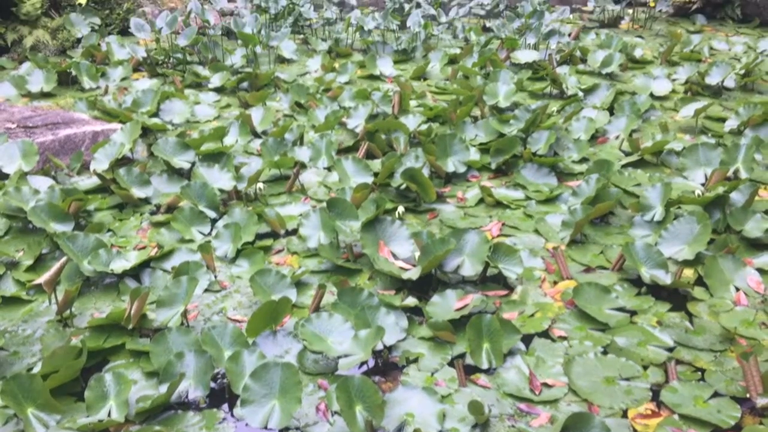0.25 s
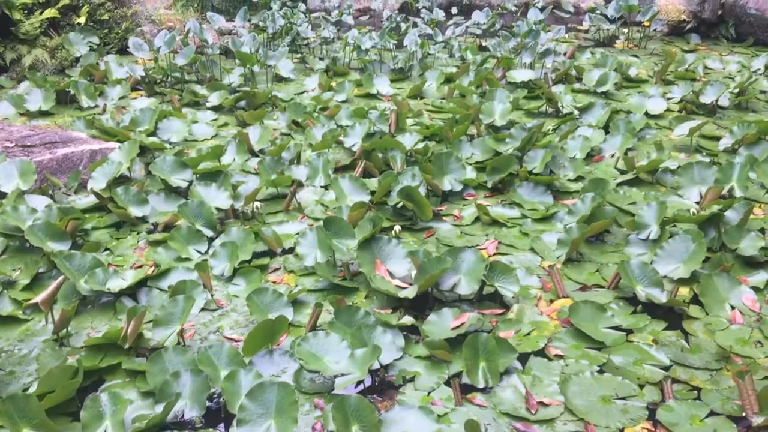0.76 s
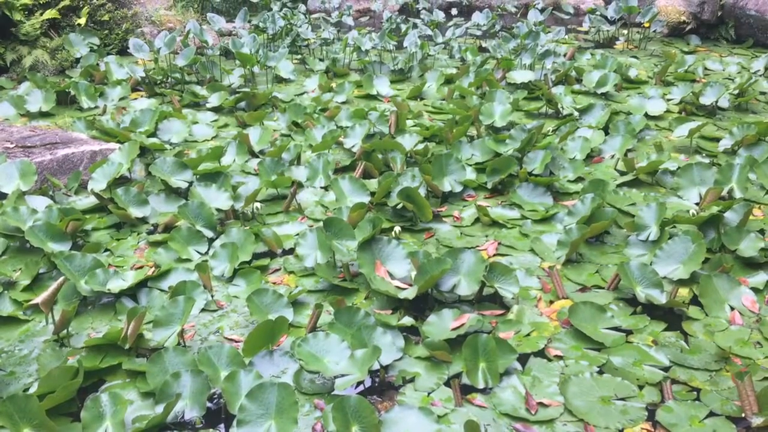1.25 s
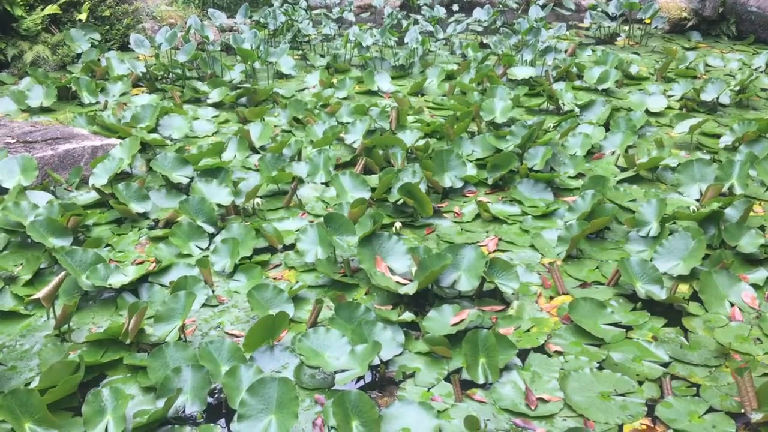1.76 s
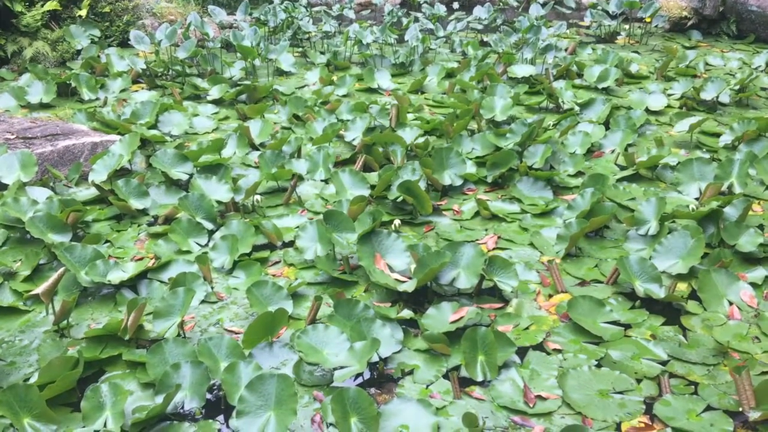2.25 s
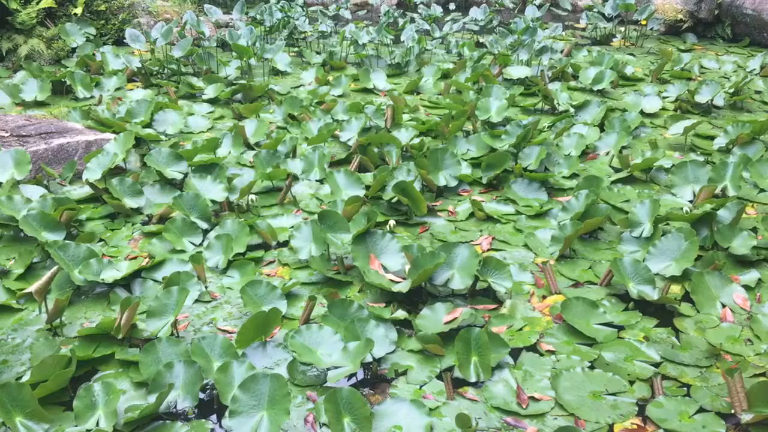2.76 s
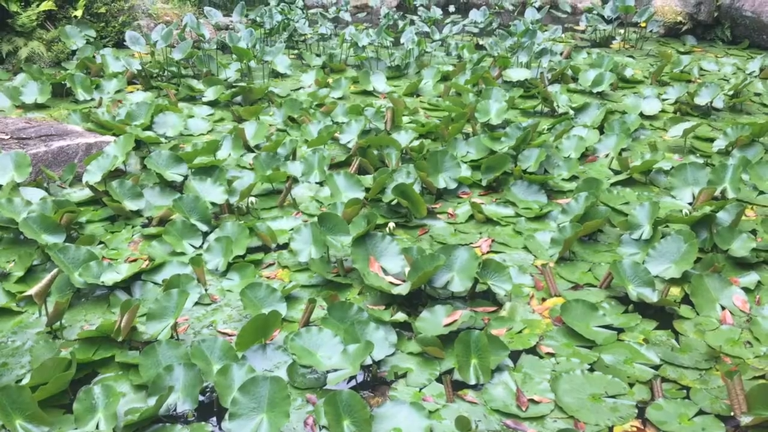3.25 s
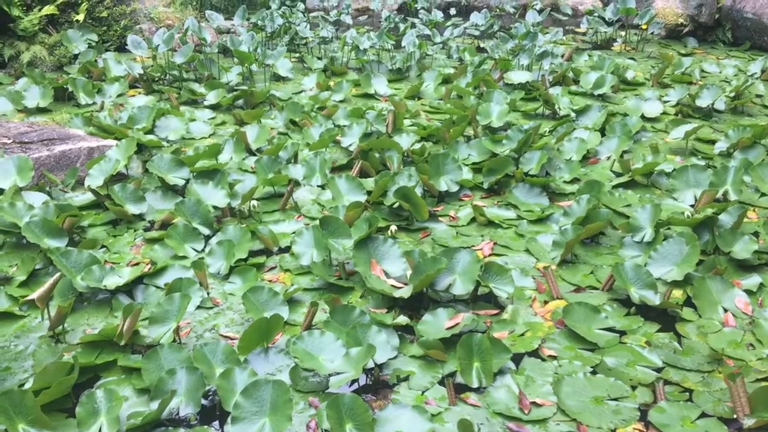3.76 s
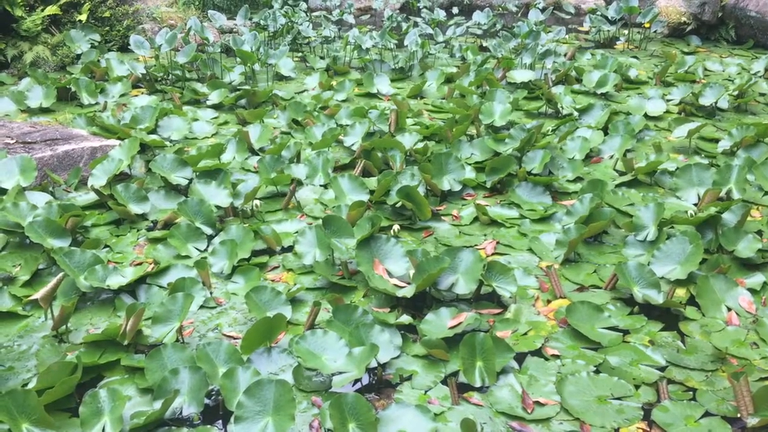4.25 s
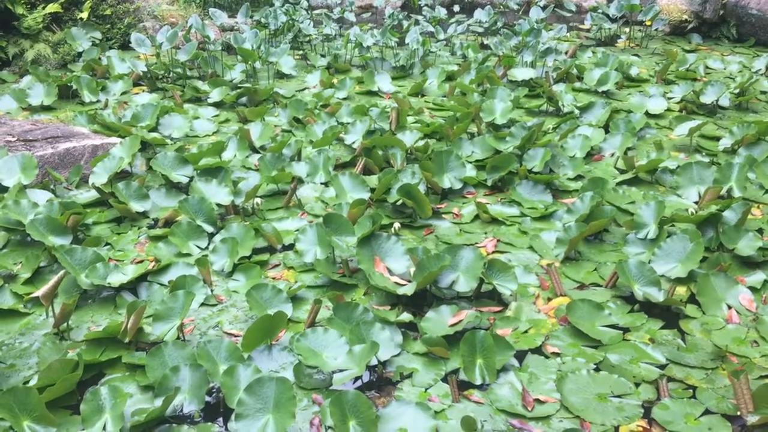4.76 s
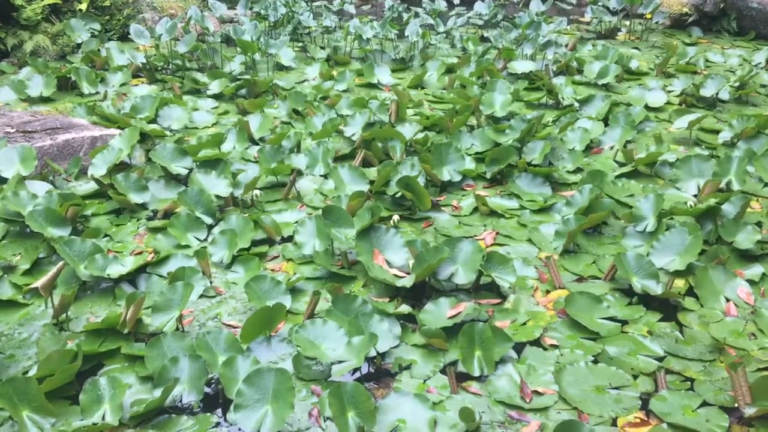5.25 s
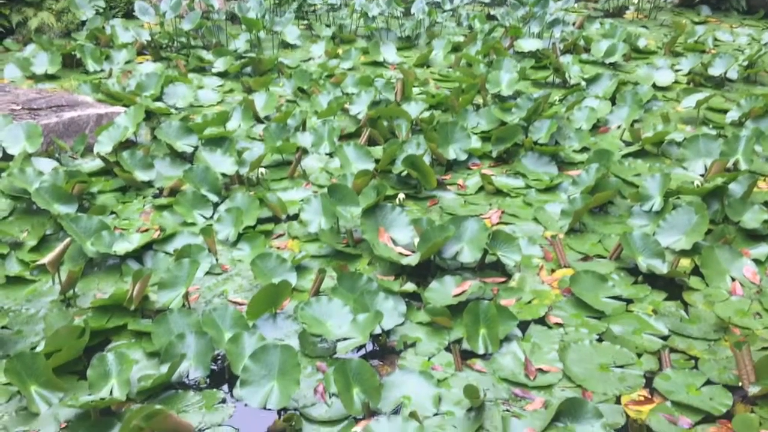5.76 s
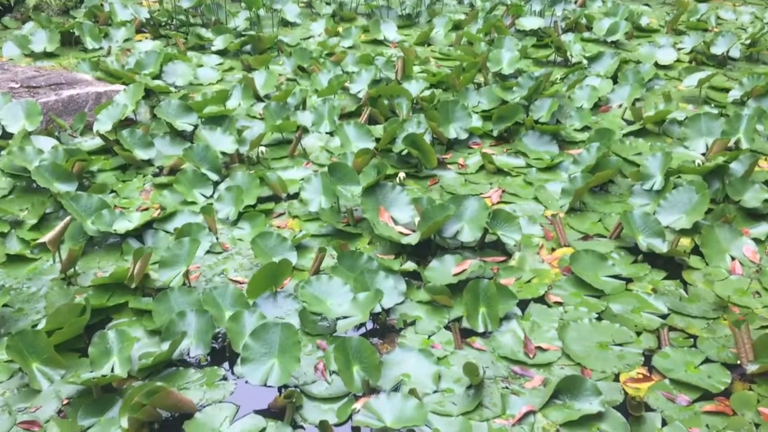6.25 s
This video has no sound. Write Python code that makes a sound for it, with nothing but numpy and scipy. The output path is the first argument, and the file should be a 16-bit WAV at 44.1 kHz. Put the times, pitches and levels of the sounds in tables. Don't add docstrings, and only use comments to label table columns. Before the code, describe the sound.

A close microphone at a pond catches two frogs giving rattles of about thirty-five clicks a second: near one first, loud and crisp, then the far one, softer and rounder, twice each before a shared ending. Distant sparrow chirps come about twice every second or so, an insect buzzes faintly, a held bird whistle breaks into fast swoops, and fingers bump the casing over quiet open-air hiss.

```python
import sys
import numpy as np
from scipy import signal
from scipy.fft import rfft, irfft
from scipy.io import wavfile
from scipy.ndimage import uniform_filter1d

SR = 44100
rng = np.random.default_rng(int(sys.argv[2]) if len(sys.argv) > 2 else 0)


def magnitude_from_level(level_db):
    exponent = np.asarray(level_db, float) / 20
    return 10 ** exponent


def unload_audio(sound):
    columns = np.transpose(np.atleast_2d(sound))
    steps = np.round(np.clip(columns, -1, 1) * 32767)
    wavfile.write(sys.argv[1], SR, steps.astype(np.int16))


N = 286650
LEAD = SR // 5

# pitch_hz, level_db (per Hz)
RUMBLE_COLOUR = [(14, -39), (24, -9.5), (43, -3.5), (59, 9.5), (70, -4), (87, -1), (113, -2.5),
                 (157, -10.5), (351, -14), (433, -31.5), (485, -24), (583, -25), (700, -23), (910, -25),
                 (1540, -120)]
AIR_COLOUR = [(240, -61), (400, 0), (425, -3), (596, -8), (685, -6.5), (849, -4.5), (1270, -3),
              (1390, -8.5), (1500, -3.5), (1890, -6), (2380, -8), (3890, -8.5), (4750, -10), (6870, -12),
              (15700, -19)]
# start_s, end_s, level_db
GUSTS = [
    (2.0, 2.8, -70.5),
    (3.2, 3.3, -63),
    (3.5, 3.6, -66),
    (4.58, 4.72, -58),
    (4.95, 5.15, -62),
]
# start_s, end_s, level_db
RUSTLES = [
    (4.68, 4.85, -79),
    (5.08, 5.28, -68.5),
    (5.5, 5.8, -72.5),
]
# start_s, peak_db, ring_hz, crack_db
TAPS = [
    (3.636, -56, 350, -12),
    (4.794, -53, 666, 5),
    (4.798, -57.5, 1140, 0),
    (4.982, -39, 582, -24),
    (4.981, -47, 266, -16),
    (5.163, -44, 1175, -18),
    (5.731, -50.5, 523, -6),
    (6.117, -44.5, 555, -3),
]
# pitch_hz, width_hz, level_db
PORT_DIPS = [(7570, 710, -3.5), (10470, 640, -4.5), (14900, 900, 4.5)]
# start_s, end_s, level_db
BUZZES = [
    (1.37, 1.85, -77.5),
    (3.42, 4.1, -75),
    (4.45, 4.9, -76),
    (5.75, 6.15, -79),
]
# start_s, level_db, pitch_factor, second_note_db
CHIRPS = [(0.626, -64, 1.01, 2.5), (1.227, -66, 1.015, 2), (1.781, -62.5, 0.99, -2.5),
          (2.764, -68, 0.99, -7), (3.398, -71.5, 1.01, 6), (3.931, -60.5, 0.99, -15),
          (4.451, -68.5, .99, 5), (4.999, -63, 0.99, -6.5), (5.891, -61.5, 1.05, 3), (6.194, -60, 1.005, 0)]
# time_s, pitch_hz, level_db
CHIRP_NOTES = [
    [(0, 4297, -3), (.01, 3986, -2.5), (.03, 4032, 1.5), (.045, 3650, -10)],
    [(.03, 3560, -5), (.042, 3460, -3.5), (.06, 2963, -7)],
]
# time_s, pitch_hz, level_db
WHISTLE = [(4.3, 2400, -60), (4.47, 2446, -63), (4.575, 2380, -75), (4.595, 2453, -55.5),
           (4.77, 2401, -50.5), (4.93, 2370, -43), (4.97, 2340, -39), (5.03, 2257, -38.5),
           (5.1, 2270, -38.5)]
# time_s, depth_db, half_width_s
BREAKS = [(4.62, -5, .008), (4.683, -18, 0.0095), (4.707, -9, 0.016), (4.756, -11.5, 0.0071),
          (4.83, -3.5, 0.02), (4.908, -5.5, 0.012), (4.958, -23, 0.0046), (4.986, -17, 0.0046),
          (5.004, -6.5, 0.0043), (5.032, -9, 0.0022), (5.045, -8.5, .003), (5.073, -13, .003),
          (5.089, -8, 0.0057)]
# time_s, pitch_hz, level_db
FLOURISH = [
    [(5.088, 2370, -56), (5.097, 3152, -44), (5.108, 3098, -36), (5.124, 2146, -35.5), (5.136, 1630, -36.5),
     (5.15, 1652, -36.5), (5.156, 1660, -66)],
    [(5.154, 1995, -41), (5.165, 2068, -33.5), (5.2, 2042, -44.5), (5.215, 2080, -46)],
    [(5.265, 2114, -48), (5.278, 2206, -31), (5.29, 2137, -36), (5.305, 1606, -38), (5.333, 1172, -49)],
    [(5.389, 3125, -61), (5.403, 5190, -50), (5.412, 5170, -46), (5.422, 3864, -37), (5.436, 2740, -39),
     (5.448, 2450, -33), (5.462, 2615, -35.5), (5.478, 3650, -40), (5.495, 4360, -48.5)],
]
# time_s, pitch_hz, level_db
THIN_LINES = [
    [(5.455, 2450, -57), (5.48, 2560, -55), (5.525, 2480, -59)],
    [(4.05, 3520, -72), (4.25, 3580, -76), (4.42, 3470, -77)],
    [(4.78, 3520, -80.5), (4.93, 3566, -76), (5.03, 3590, -77)],
]
# start_s, end_s, full_level_db, tilt_db (per octave)
FAR_CROAKS = [
    (2.073, 2.797, -48.5, 0.5),
    (3.134, 3.904, -45.5, 1.5),
    (5.803, 6.474, -45.5, 1.5),
]
# first_s, last_s, clicks (count)
FAR_RUNS = [(2.128, 2.2319, 5), (2.2539, 2.6298, 16), (2.6576, 2.7626, 5), (2.7969, 2.7969, 1),
            (3.1151, 3.1912, 4), (3.2127, 3.4397, 10), (3.466, 3.8028, 14), (3.8345, 3.8345, 1),
            (5.9985, 6.3773, 16), (6.4043, 6.4589, 3)]
# pitch_hz, width_hz, level_db
FAR_BODY = [(1212, 405, 3), (1930, 990, 2.5), (1687, 83, -11), (2370, 83, -19.5), (4800, 10000, -12.5),
            (2655, 105, -18.5)]
# delay_s, pressure_factor
FAR_ECHOES = [(.00081, .35), (.00188, .28), (.00268, -.38), (.0069, .12), (.0105, .15)]
# start_s, end_s, full_level_db
NEAR_CROAKS = [
    (-.2, .77, -30.5),
    (3.562, 4.46, -31),
    (5.346, 6.377, -30),
]
# first_s, last_s, clicks (count)
NEAR_RUNS = [(-.17, -.058, 5), (-.0015, .0269, 2), (.0832, .1121, 2), (.1682, .1979, 2), (.2264, .4491, 9),
             (.4773, .7315, 10), (.7682, .7682, 1), (3.5868, 3.8857, 12), (3.9393, 3.9674, 2),
             (4.0209, 4.0753, 3), (4.1287, 4.1829, 2), (4.2114, 4.2937, 4), (4.3216, 4.3777, 3),
             (4.4065, 4.436, 2), (5.3835, 5.5743, 8), (5.6284, 5.7424, 3), (5.7721, 5.9382, 4),
             (5.9661, 6.0209, 2), (6.0508, 6.1054, 2), (6.1341, 6.3313, 8), (6.3641, 6.3641, 1)]
# pitch_hz, width_hz, level_db
SLACK_SAC = [(936, 110, -8.5), (2270, 1550, 3.5), (1896, 624, 10.5), (1513, 550, 0.5), (2740, 780, -8),
             (5540, 260, -26), (2980, 310, -41), (3390, 140, -25.5)]
TAUT_SAC = [(904, 130, -17), (2450, 2100, 2.5), (2167, 453, 9.5), (1390, 86, -26.5), (2680, 11300, -6),
            (5520, 260, -28), (2940, 227, -4), (3494, 440, -14)]
# delay_s, pressure_factor
NEAR_ECHOES = [(.00195, -.58), (.0046, -.27), (.00557, -.26), (.007, .12)]


def rms_one(x):
    return x / np.sqrt(np.mean(x ** 2) + 1e-30)


def noise(count=N):
    return rng.standard_normal(count)


def band(x, order, low_hz, high_hz):
    return signal.sosfilt(signal.butter(order, [low_hz, high_hz], "band", fs=SR, output="sos"), x)


def drift(rate_hz):
    r = np.exp(-2 * np.pi * rate_hz / SR)
    wander = signal.lfilter([1], [1, -2 * r, r * r], noise(N + SR))
    return rms_one(wander[SR:])


def coloured(colour):
    hz, db = np.transpose(colour)
    bins = np.arange(1, N // 2 + 2) * SR / N
    shape = magnitude_from_level(np.interp(np.log(bins), np.log(hz), db))
    return rms_one(irfft(rfft(noise()) * shape, N))


def bouts(rows, edge_s):
    t = np.arange(N) / SR
    total = np.zeros(N)
    for start, end, db in rows:
        total += magnitude_from_level(db) * (np.tanh((t - start) / edge_s) - np.tanh((t - end) / edge_s)) / 2
    return total


def add(out, at, sound):
    out[at:at + len(sound)] += sound[:N - at]


def ring(clicks, hz, width_hz):
    r, w = np.exp(-np.pi * width_hz / SR), 2 * np.pi * hz / SR
    return signal.lfilter([0, np.sin(w)], [1, -2 * r * np.cos(w), r * r], clicks + 1e-18)


def banks(x, wet_db, t60, onset_s, echoes, cut_hz, low_hz=200):
    t = np.arange(SR) / SR
    decay = magnitude_from_level(-60 * t / t60) + magnitude_from_level(-23.0 - 60 * t / 0.85)
    tail = noise(SR) * decay * (1 - np.exp(-(t / onset_s) ** 2))
    tail = band(tail, 1, low_hz, min(cut_hz, 18000))
    reply = magnitude_from_level(wet_db) * tail / np.sqrt(np.sum(tail ** 2))
    for delay_s, factor in echoes:
        reply[round(delay_s * SR)] += factor
    return x + signal.fftconvolve(x, reply)[:len(x)]


def note(rows, start=0., pitch=0.99, smooth_s=0.002):
    s, hz, db = np.transpose(rows)
    t = np.arange(s[0], s[-1], 1 / SR)
    glide = uniform_filter1d(np.interp(t, s, hz) * pitch, int(smooth_s * SR))
    phase = 2 * np.pi * np.cumsum(glide) / SR
    ends = np.clip(np.minimum(t - s[0], s[-1] - t) / 0.0023, 0, 1)
    tone = np.sin(phase) + magnitude_from_level(-40) * np.sin(2 * phase)
    return round((start + s[0]) * SR), np.sqrt(2) * magnitude_from_level(np.interp(t, s, db)) * ends * tone


def beats(runs, croaks, swell_db, swell_s, grow_db_per_s, uneven_db, uneven_s):
    s = np.concatenate([np.linspace(*run) for run in runs])
    croaks = np.array(croaks)
    row = croaks[np.searchsorted(croaks[:-1, 1] + .15, s)]
    age = s - row[:, 0]
    left = np.maximum(row[:, 1] - s, 0)
    chance = rng.standard_normal((len(s), 2))
    db = row[:, 2] - swell_db * np.clip(1 - age / swell_s, 0, 1) ** 2
    db = db + grow_db_per_s * age + uneven_db * chance[:, 0]
    return s + uneven_s * chance[:, 1], left, db, row


def sac(times, gains, modes, top_hz, tilt_db=0.):
    at, out = np.round(times * SR).astype(int) + LEAD, np.zeros(N + LEAD)
    chance = rng.standard_normal((len(at), len(modes)))
    for k, (hz, width_hz, db) in enumerate(modes):
        spread_db = 1.2 + 2.5 * (hz > 5000)
        strike_db = db + tilt_db * np.log2(hz / 1250) + spread_db * chance[:, k]
        clicks = np.zeros(N + LEAD)
        clicks[at] = gains * magnitude_from_level(strike_db) * np.e * np.pi * width_hz / SR
        out += (-1) ** k * ring(ring(clicks, hz, width_hz), hz, width_hz)
    return band(out, 2, 560, top_hz)


def snaps(times, gains):
    level_db, spread_db, fade_s = -37, 3, .0018
    chance = np.minimum(rng.exponential(1, len(times)), 2)
    clicks = np.zeros(N + LEAD)
    clicks[np.round(times * SR).astype(int) + LEAD] = gains * magnitude_from_level(level_db + spread_db * chance)
    fade = signal.lfilter([1], [1, -np.exp(-1 / (fade_s * SR))], clicks + 1e-18)
    return band(fade * noise(N + LEAD), 1, 4500, 13000)


def rumble():
    level = magnitude_from_level(-65.5) + bouts(GUSTS, edge_s=0.057) / 2
    return level * magnitude_from_level(3.0 * drift(11)) * coloured(RUMBLE_COLOUR)


def air():
    return magnitude_from_level(-71.5 + 0.9 * drift(30)) * coloured(AIR_COLOUR)


def rustle():
    rub = band(noise(), 2, 220, 800)
    return bouts(RUSTLES, edge_s=0.033) * magnitude_from_level(5.8 * drift(26)) * rms_one(rub)


def taps():
    out = np.zeros(N)
    t = np.arange(2000) / SR
    dull = signal.butter(2, 2500, fs=SR, output="sos")
    for s, db, hz, crack_db in TAPS:
        knock = np.sin(2 * np.pi * hz * t) * np.exp(-t / 0.0053)
        crack = signal.sosfilt(dull, noise(len(t))) * np.exp(-t / 0.017)
        add(out, round(s * SR), magnitude_from_level(db) * (knock + magnitude_from_level(crack_db) * crack))
    return out


def insect():
    pitch_hz, width_hz = 5220, 600
    buzz = ring(ring(noise(), pitch_hz, width_hz), pitch_hz, width_hz)
    return bouts(BUZZES, edge_s=0.08) * magnitude_from_level(0.98 * drift(25)) * rms_one(buzz)


def sparrow():
    out = np.zeros(N)
    for s, db, pitch, second_db in CHIRPS:
        for rows, note_db in zip(CHIRP_NOTES, (db, db + second_db)):
            at, sound = note(rows, s, pitch)
            add(out, at, magnitude_from_level(note_db) * sound)
    flutter_hz = 340 * (1 + 0.072 * drift(29.7))
    flutter = np.cos(2 * np.pi * np.cumsum(flutter_hz) / SR)
    out *= 1 + 1.04 * flutter + 0.96 * drift(450)
    return banks(out, wet_db=-6.0, t60=0.55, onset_s=0.011, echoes=[], cut_hz=19000)


def warbler():
    whistle, flourish, t = np.zeros(N), np.zeros(N), np.arange(N) / SR
    add(whistle, *note(WHISTLE))
    whistle *= magnitude_from_level(sum(db * np.exp(-((t - s) / half) ** 2) for s, db, half in BREAKS))
    for rows in FLOURISH + THIN_LINES:
        add(flourish, *note(rows))
    whistle = banks(whistle, wet_db=-14.0, t60=.8, onset_s=.01, echoes=[], cut_hz=9000)
    flourish = banks(flourish, wet_db=-2.5, t60=0.78, onset_s=0.0011, echoes=[(.052, 0.11)],
                     cut_hz=7900, low_hz=2220)
    return whistle + flourish


def far_frog():
    s, left, db, row = beats(FAR_RUNS, FAR_CROAKS, swell_db=16.5, swell_s=0.4, grow_db_per_s=2.0,
                             uneven_db=1.1, uneven_s=.0007)
    shy_db = 6 * np.exp(-(s - row[:, 0]) / 0.097)
    tired_db = 15.5 * np.exp(-left / 0.049)
    tilt_db = row[:, 3] - tired_db - shy_db
    voice = sac(s - .0008, magnitude_from_level(db + 2.5), FAR_BODY, top_hz=6900, tilt_db=tilt_db)
    return banks(voice, wet_db=-10.0, t60=0.18, onset_s=0.014, echoes=FAR_ECHOES, cut_hz=10600)[LEAD:]


def near_frog():
    s, left, db, row = beats(NEAR_RUNS, NEAR_CROAKS, swell_db=16.5, swell_s=0.33, grow_db_per_s=0.33,
                             uneven_db=.3, uneven_s=.00035)
    least_slack = 0.29
    slackening = (1 - least_slack) * np.exp(-left / 0.14)
    unfilled = 0.21 * np.exp(-(s - row[:, 0]) / 0.13)
    slack = np.clip(least_slack + slackening + unfilled, 0, 1)
    db = db - 9.5 * np.exp(-left / 0.095) - 5.5 * np.exp(-left / .025)
    gain = magnitude_from_level(db - 2.0 + 6.1 * slack)
    voice = sac(s - .00025, gain * (1 - slack), TAUT_SAC, top_hz=7200)
    voice += sac(s - .00025, gain * slack, SLACK_SAC, top_hz=7040)
    voice += snaps(s, gain)
    return banks(voice, wet_db=-11.5, t60=0.22, onset_s=0.009, echoes=NEAR_ECHOES, cut_hz=1740)[LEAD:]


def scene():
    background = rumble() + air() + rustle() + taps()
    animals = insect() + sparrow() + warbler() + far_frog() + near_frog()
    return (background + animals)[None]


def band_limit(x):
    return signal.sosfilt(signal.butter(12, 15890, fs=SR, output="sos"), x)


def record(dry):
    for hz, width_hz, db in PORT_DIPS:
        peak = signal.lfilter(*signal.iirpeak(hz, hz / width_hz, fs=SR), dry)
        dry = dry - (1 - magnitude_from_level(min(db, 0))) * peak
    mix = signal.sosfilt(signal.butter(4, 36, "high", fs=SR, output="sos"), dry)
    return band_limit(mix)


dry = scene()
out = record(dry)
unload_audio(out)
```